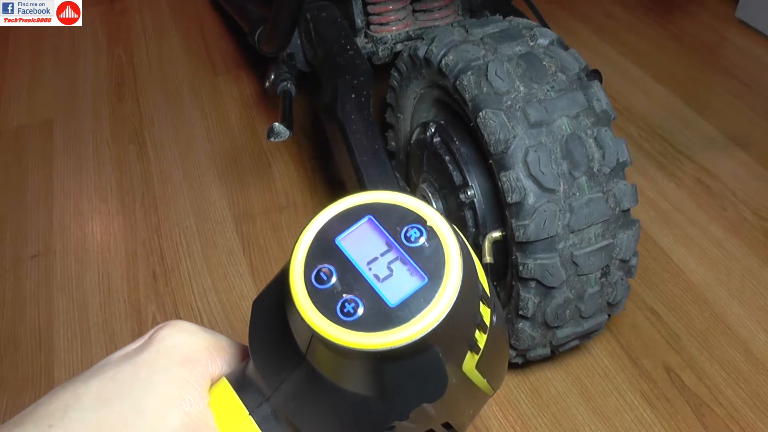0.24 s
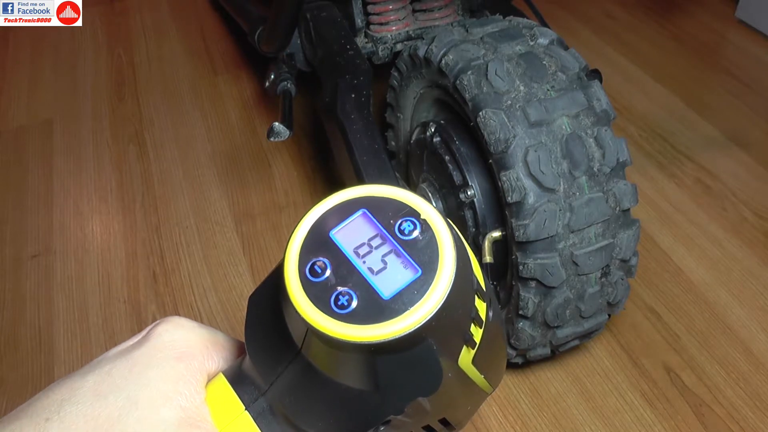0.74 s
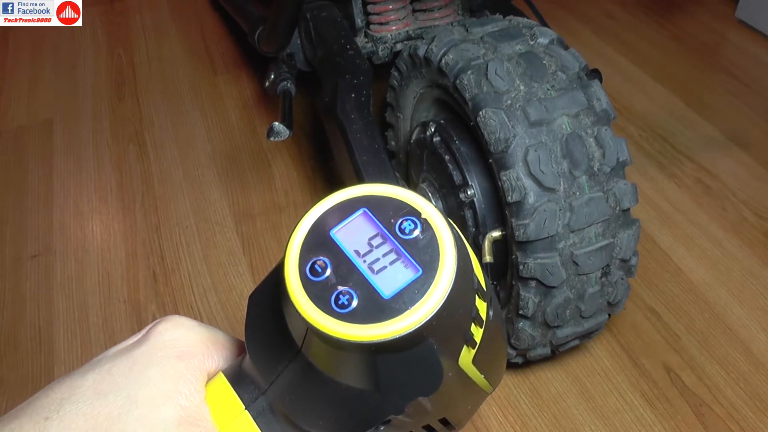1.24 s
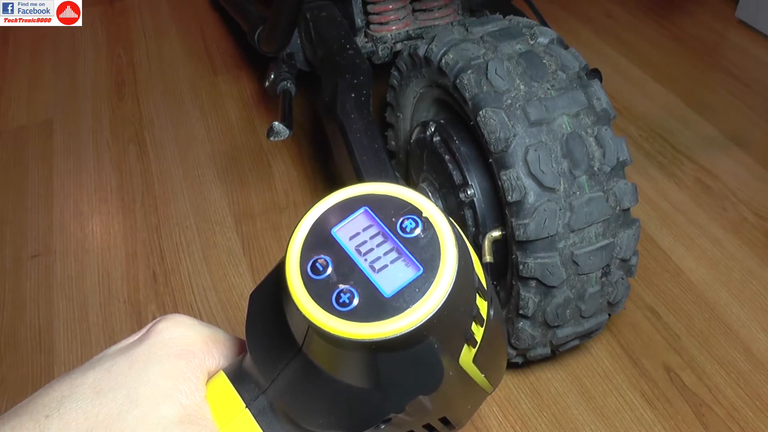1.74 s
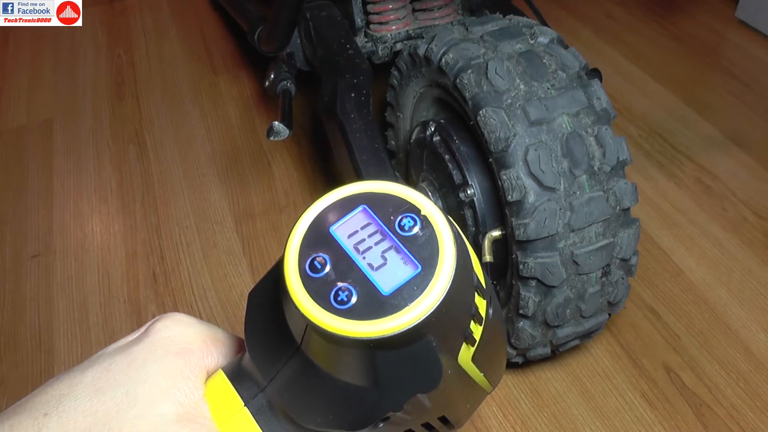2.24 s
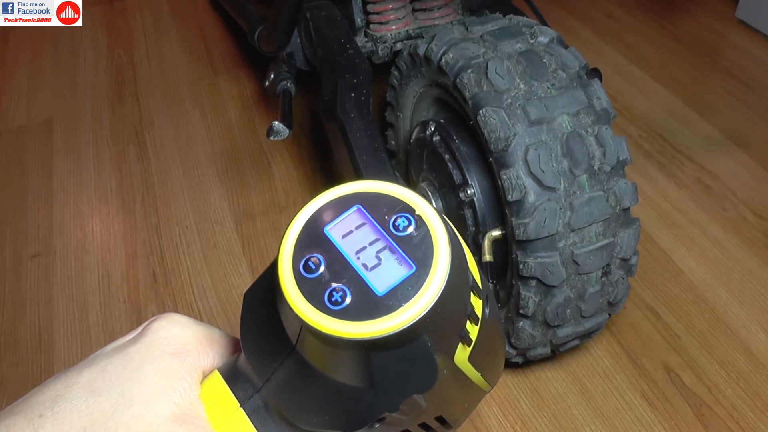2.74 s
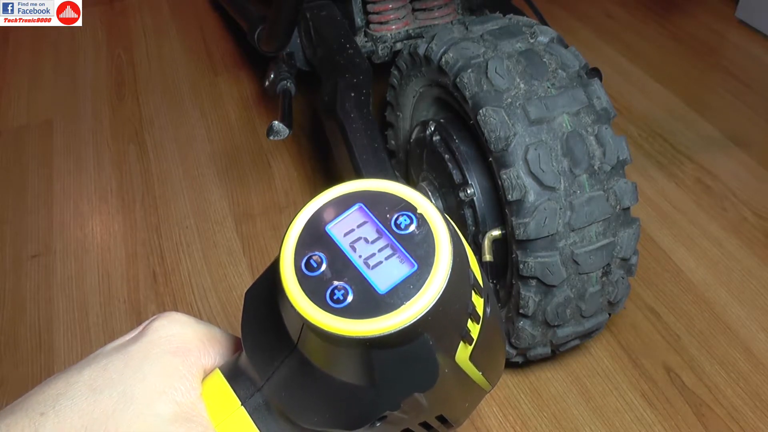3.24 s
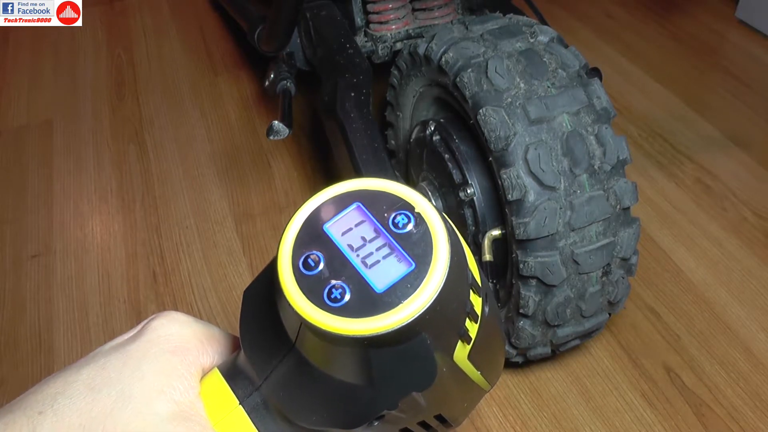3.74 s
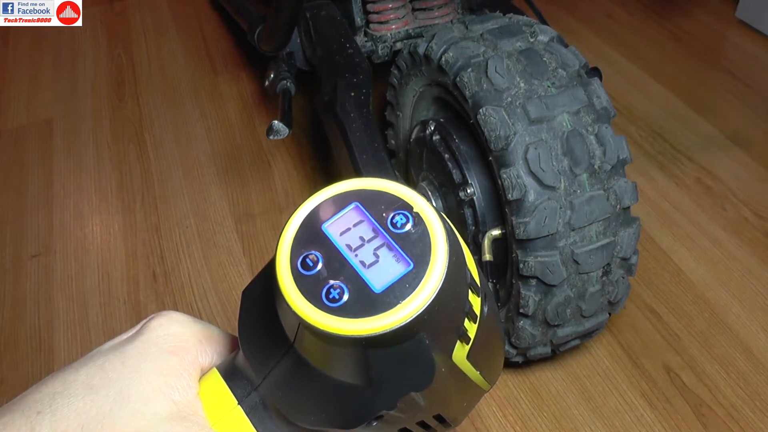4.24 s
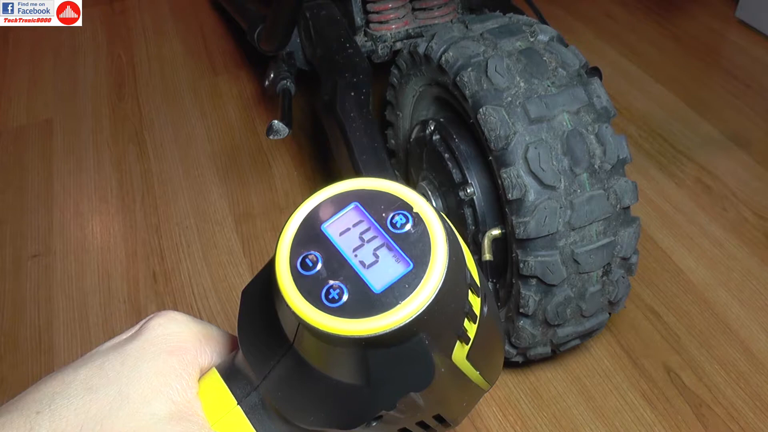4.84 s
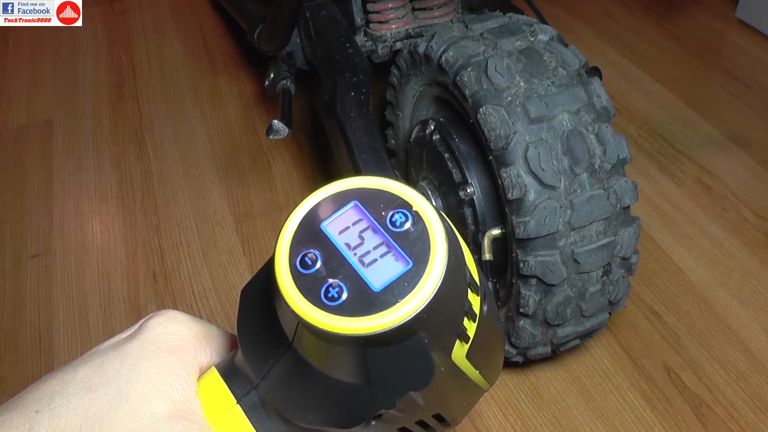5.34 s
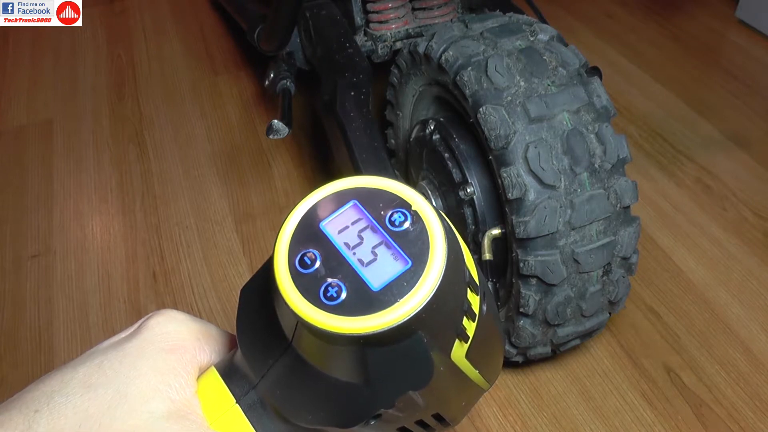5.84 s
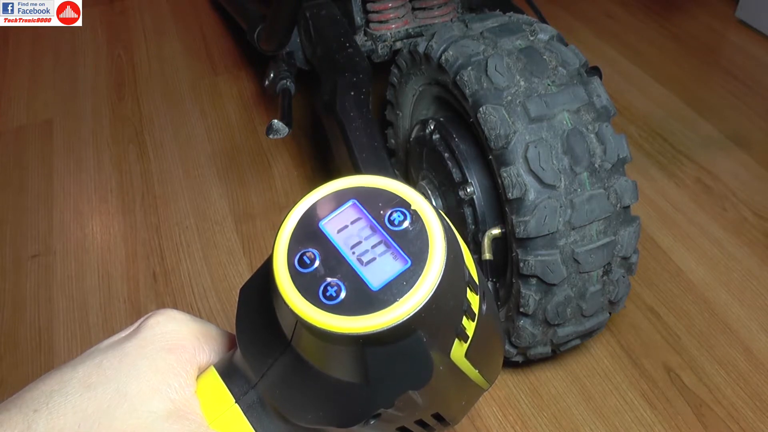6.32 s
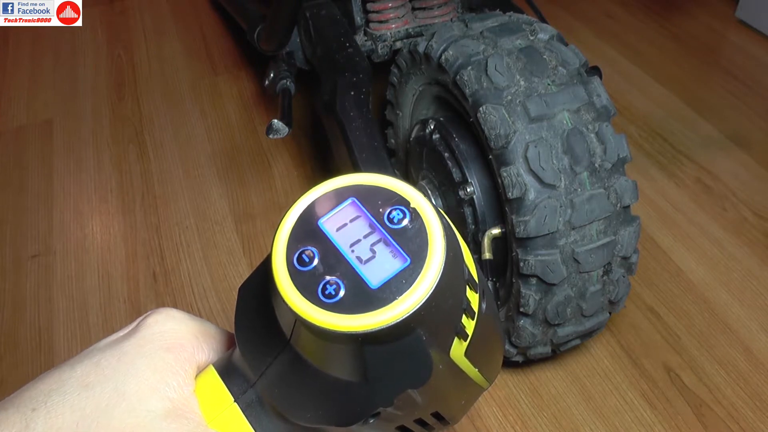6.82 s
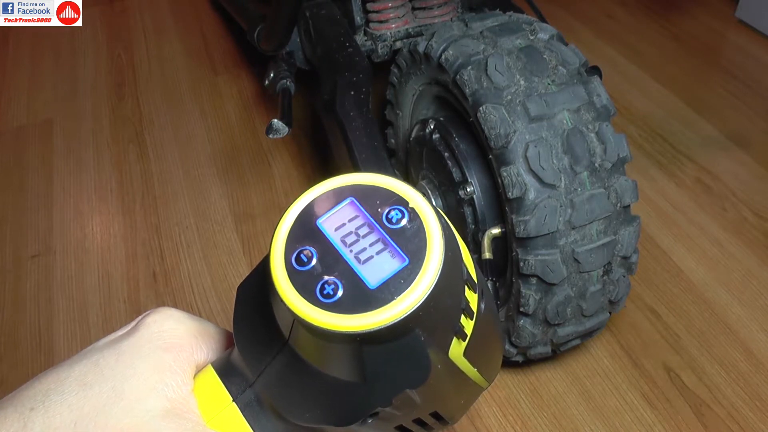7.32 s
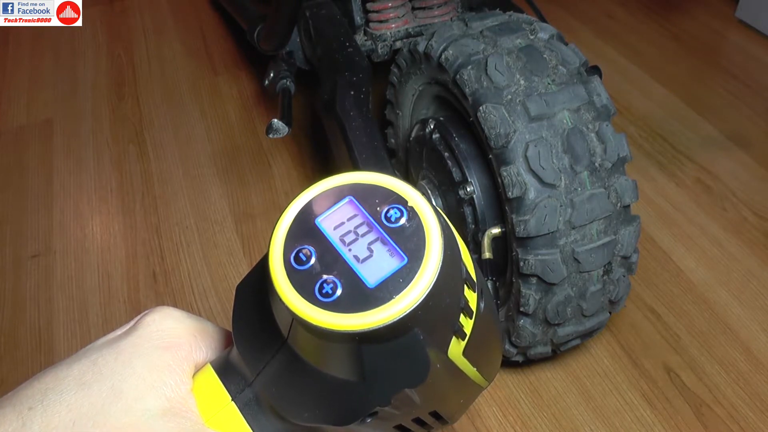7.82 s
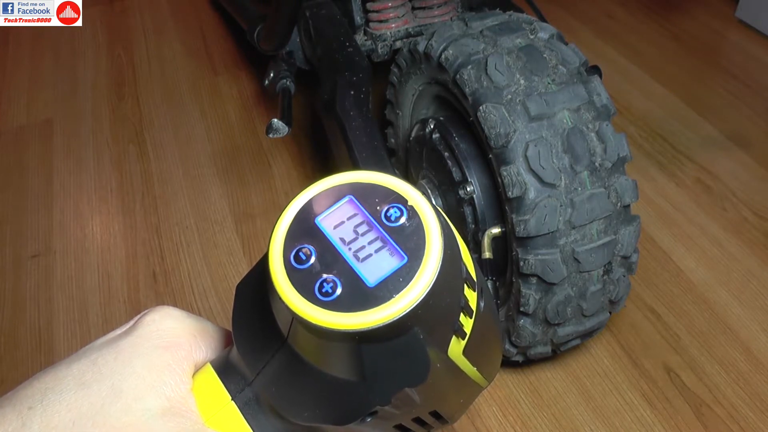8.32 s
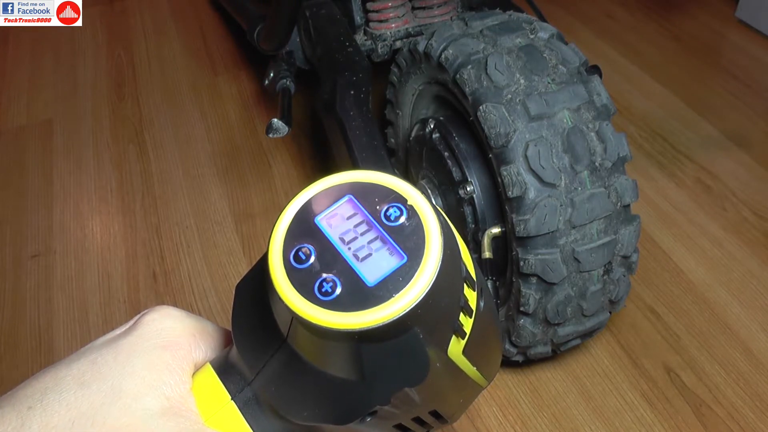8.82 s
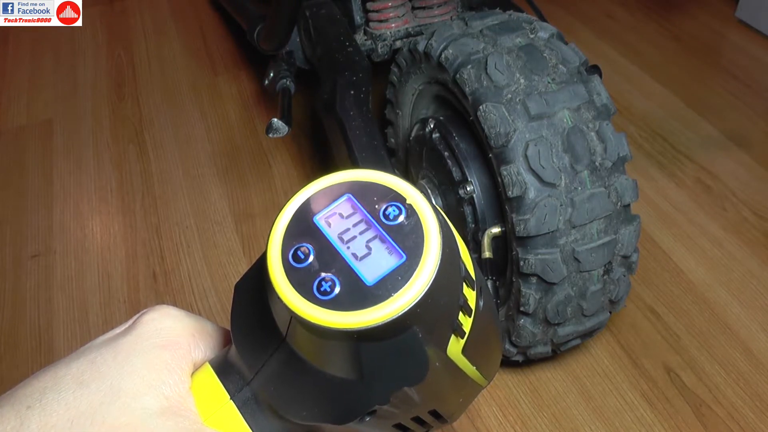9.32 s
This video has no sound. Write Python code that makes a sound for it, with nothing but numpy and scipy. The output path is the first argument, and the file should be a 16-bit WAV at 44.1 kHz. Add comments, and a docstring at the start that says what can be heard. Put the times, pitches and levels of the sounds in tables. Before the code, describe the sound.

A small battery tyre inflator runs nonstop, a harsh buzzing motor drone with gear whine and rattle, hardening slightly as pressure rises.

```python
"""In a room with a wooden floor, a hand-held battery inflator pumps up a tyre.
A small motor drives the crank through an 11:49 gear pair, whose teeth whine and rattle under the load
of about fifty compression strokes a second. On each stroke the outlet valve pops, rings the cylinder and
hose, and spits air. The rotor hums, the brushes ring the motor can, air rushes and the room reflects it all;
rising pressure slows the crank and hardens the pop."""
import sys
import numpy as np
from scipy import signal
from scipy.fft import rfft, irfft, next_fast_len
from scipy.io import wavfile
from scipy.ndimage import uniform_filter1d

SR = 44100
rng = np.random.default_rng(int(sys.argv[2]) if len(sys.argv) > 2 else 0)


def dump_mix(stems):
    """Bounce the given channels to the path in sys.argv[1] as a 16-bit WAV at rate SR."""
    frames = np.atleast_2d(stems).T  # one column per channel
    limited = np.clip(frames, -1, 1)  # hard clip at full scale
    pcm = np.round(limited * 32767).astype(np.int16)
    wavfile.write(sys.argv[1], SR, pcm)


N = 422037
TIME = np.arange(N) / SR
SIDES = np.array([[1], [-1]])  # sign of a left-right difference: left, right

# The crank slows as the tyre fills. Each row: time in seconds, speed in turns per second.
CRANK_SPEED = [(0.0, 52.233), (2.78, 51.364), (4.23, 51.016), (5.77, 50.489), (6.95, 50.29), (8.29, 49.952),
               (9.57, 49.778)]
PINION_TEETH, WHEEL_TEETH = 11, 49
START_TURN = .2  # crank angle at the start, in turns
# Back pressure on the pump, which only rises. Each row: time in seconds, pressure from 0 (soft) to 1 (hard).
BACK_PRESSURE = [(0, .11), (2.8, .15), (4.6, .48), (9.57, 1)]
# Relative force on the teeth round the crank. Each row: angle in turns, dB at a soft tyre, dB at a hard tyre.
TOOTH_FORCE = [(0, 3.5, 1), (.08, -1, 4), (.17, -21, -3.5), (.3, -6, -2), (.58, -15, -30), (.7, -14, -10),
               (.79, 0.5, -4.5), (.9, 2.5, 5)]
# Harmonics 1-6 of the tooth rate. Each row: relative level in dB at a soft tyre, the same at a hard tyre,
# lag behind the load in turns at a soft tyre, the same at a hard tyre, growth in dB per dB of load,
# left-right difference in dB, lead of the left side in radians.
WHINE_HARMONICS = [(-17, -6, -0.031, 0.077, 2, 5.5, 0.6), (1.5, 0.4, -0.034, -0.027, 1.4, 2, 0.2),
                   (1.9, -2, 0.055, -0.061, 1.66, -2, 0.16), (-7, -12.5, -0.061, -.012, 1.4, 4, 0.63),
                   (-12, -12, -0.022, -0.024, 1.5, -4, 0.64), (-31, -27, -.012, -.012, 1.02, -1.5, .75)]
# Spectrum of the gear rattle. Each row: frequency in Hz, relative density in dB per Hz.
RATTLE_SPECTRUM = [(60, -45), (500, -20), (1150, -10), (1650, -7.5), (2300, 5.5), (2900, -12.5), (4600, -4),
                   (5800, -4), (6600, -1.5), (8300, -0.5), (10200, 2), (11700, -3.5), (13000, 2.5),
                   (15800, -28)]
# Housing resonances that shape the rattle. Each row: centre in Hz, width in Hz, rise (or fall) in dB.
HOUSING_PEAKS = [(5030, 350, -11), (7440, 190, 13), (8860, 450, 11), (12600, 550, -7)]
# Gain of the gear sound: dB at a soft tyre, dB at a hard tyre.
GEAR_GAIN_DB = (-22, -20.5)
# The gear sound moves slowly from right to left: left-right dB at the start, and dB per second.
GEAR_PAN_DB, GEAR_PAN_DB_PER_S = -1.2, 0.25
# Crank angle at which the valve opens: turns at a soft tyre, turns at a hard tyre.
OPENING_TURN = (.11, .145)
# Strength of the valve's pop. Each row: time in seconds, level in dB.
POP_LEVEL = [(0, -26.5), (2.7, -27.5), (4.5, -25.1), (9.57, -24.5)]
# Cylinder and hose resonances rung by the valve.
# Each row: centre in Hz, width in Hz, relative level in dB at a soft tyre, the same at a hard tyre.
CHAMBER_MODES = [(88, 41, -39.5, -41.5), (192, 37, -38.5, -42.5), (292.5, 74, -38.5, -45.5),
                 (404.8, 15.8, -31.5, -43), (567.5, 132, -39, -29.5), (741, 91, -27.5, -30),
                 (1038, 52, -33.5, -39)]
# Hum of the three-pole rotor. Each row: multiple of the motor speed, level in dB at zero back pressure.
ROTOR_HUM = [(1, -59.5), (2, -47), (3, -36.5), (4, -52.5), (5, -48), (6, -49), (9, -45.5)]
# Spectrum of air rushing through the valve. Each row: frequency in Hz, relative density in dB per Hz.
AIR_SPECTRUM = [(30, -42), (100, -31), (220, -23), (380, -13.5), (480, -3.5), (750, -0.5), (940, -3.5),
                (1120, -4.5), (1650, -7.5), (2100, -6), (3000, -10.5), (6500, -5.5), (10000, -9.5),
                (15000, -31)]
# Relative air flow round the crank. Each row: angle in turns, strength in dB.
AIR_FLOW = [(.05, -2.5), (.17, -7.5), (.29, -2), (.4, -8.5), (.6, -7), (.85, -4.5)]
# Spectrum of the spit as the valve cracks open. Each row: frequency in Hz, relative density in dB per Hz.
SPIT_SPECTRUM = [(60, -42), (400, -14), (950, -16), (1150, 6), (1700, -0.5), (2200, -2), (2800, -8),
                 (3400, 2.5), (6500, -1), (10000, -2), (15000, -13)]
# Resonances of the motor can, rubbed by the brushes. Each row: centre in Hz, half the width in Hz of each
# of two resonators in series, level in dB at a soft tyre, the same at a hard tyre.
CAN_MODES = [(1102, 32, -46, -53), (2223, 150, -64, -36.5), (4141, 44, -45, -37), (6690, 97, -43.5, -39.5)]
# Likeness of noise at the two microphones. Each row: frequency in Hz, likeness (held within 0-1 after reading).
MIC_LIKENESS = [(100, -0.2), (700, 2), (1500, 0.7), (4000, 1.3), (6500, 1), (9000, .45), (13000, 0.13)]
# Balance of noise over the two microphones. Each row: frequency in Hz, left-right difference in dB.
MIC_PAN = [(100, -11), (700, -1.5), (1300, 0), (2400, 2), (3200, -0.5), (6000, -1.5), (8100, 12.5),
           (8800, -1.5), (10300, -0.5), (11300, -5), (12800, -2.5), (15000, -13)]
ROOM_T60_S, ROOM_DB = 0.22, -14
CUTOFF_HZ = 15800


def from_db(db):
    """A level in decibels is twenty times the logarithm of the amplitude ratio."""
    return 10 ** (np.asarray(db) / 20)


def in_time(rows):
    """Slow changes are linear between known times; gives one curve for each column."""
    known_s, *columns = np.transpose(rows)
    return [np.interp(TIME, known_s, column) for column in columns]


def round_crank(rows, turn):
    """A machine repeats with every turn, so each column is read periodically in angle."""
    angle, *columns = np.transpose(rows)
    return [np.interp(turn, angle, column, period=1) for column in columns]


def at_hz(points, hz):
    """A spectrum is read linearly on a logarithmic frequency axis."""
    known_hz, value = np.transpose(points)
    return np.interp(np.log(hz), np.log(known_hz), value)


def between(soft, hard, pressure):
    """A quantity moves linearly with the tyre pressure."""
    return soft + (hard - soft) * pressure


def evened(x):
    """Dividing by the running rms over half a second holds the mean power at 1."""
    power = np.mean(np.atleast_2d(x) ** 2, axis=0)
    return x / np.sqrt(uniform_filter1d(power, size=SR // 2) + 1e-20)


def drift(rate):
    """Low-passed noise of spread 1 wanders smoothly, about rate times a second."""
    hz = np.fft.rfftfreq(N, 1 / SR)
    slow = irfft(rfft(rng.standard_normal(N)) / (1 + (hz / rate) ** 2), N)
    return slow / slow.std()


def resonate(x, hz, width_hz):
    """A damped mode is a pole pair whose radius sets the bandwidth; its peak gain is 1."""
    radius = np.exp(-np.pi * abs(width_hz) / SR)
    zeros = np.array([1, 0, -1]) * (1 - radius * radius) / 2
    poles = [1, -2 * radius * np.cos(2 * np.pi * hz / SR), radius * radius]
    return signal.lfilter(zeros, poles, x)


def radiate(pair, spectrum, peaks=()):
    """Mixing two unrelated, coloured noises sets the coherence of the two microphones; overall rms 1."""
    size = next_fast_len(N + SR // 10)
    hz = np.fft.rfftfreq(size, 1 / SR) + 1
    peaks_db = sum(db / (1 + (2 * (hz - centre) / width) ** 2) for centre, width, db in peaks)
    mid, side = rfft(pair, size) * from_db(at_hz(spectrum, hz) + peaks_db)
    alike = np.clip(at_hz(MIC_LIKENESS, hz), 0, 1)
    both = np.sqrt(1 + alike) * mid + SIDES * np.sqrt(1 - alike) * side
    both = both * from_db(SIDES * at_hz(MIC_PAN, hz) / 2)
    out = irfft(both, size)[:, :N]
    return out / out.std()


def tooth_load(turn, pressure):
    """Tooth force, in dB, peaks in compression and lasts longer against a hard tyre."""
    return between(*round_crank(TOOTH_FORCE, turn), pressure)


def gear_whine(turn, mesh, pressure, flutter=0.096, slip_rad=0.033):
    """Meshing teeth excite harmonics of the tooth rate, which swell with load; no two teeth meet quite alike."""
    whine = 0
    for k, row in enumerate(WHINE_HARMONICS, 1):
        soft_db, hard_db, soft_lag, hard_lag, grip, pan_db, lead_rad = row
        lag_turn = between(soft_lag, hard_lag, pressure)
        force_db = grip * tooth_load(turn - lag_turn, pressure)
        force = from_db(force_db) / np.sqrt(np.mean(from_db(2 * force_db)))  # rms 1
        level = from_db(between(soft_db, hard_db, pressure) + SIDES * pan_db / 2)
        gain = level * force * (1 + flutter * drift(280))
        phase = 2 * np.pi * k * (mesh + k / 4) + slip_rad * drift(150) + SIDES * lead_rad / 2
        whine = whine + gain * np.cos(phase)
    return evened(whine)


def gear_rattle(motor, mesh, force, repeating=0.93, tooth_depth=0.62):
    """Pinion flaws give noise that recurs every motor turn; the rest is chance, and the teeth chop both."""
    flaws = irfft(np.exp(2j * np.pi * rng.random(size=(2, 72))), n=4096)
    worn = np.array([np.interp(motor % 1, np.linspace(0, 1, len(flaw)), flaw / flaw.std()) for flaw in flaws])
    share = np.clip(repeating, 0, 1)  # of the power
    grit = np.sqrt(share) * worn + np.sqrt(1 - share) * rng.standard_normal((2, N))
    chopping = 1 + tooth_depth * np.cos(2 * np.pi * mesh)
    return radiate(grit * force * chopping, RATTLE_SPECTRUM, HOUSING_PEAKS)


def clicks_at(turn, opening, jitter_s, uneven_db):
    """An impulse marks each passage of the crank through the opening angle, slightly uneven in time and size."""
    passed = turn - opening
    strokes = np.arange(np.ceil(passed[0]), passed[-1])
    chance = rng.standard_normal((len(strokes), 2))
    at = np.interp(strokes, passed, np.arange(N)) + jitter_s * SR * chance[:, 0]
    at = np.clip(at, 0, N - 2)
    size = from_db(uneven_db * chance[:, 1])
    # each impulse is shared between the two nearest samples
    whole, part = at.astype(int), at % 1
    return np.bincount(whole, size * (1 - part), N) + np.bincount(whole + 1, size * part, N)


def valve(turn, angle, pressure, bounce=0.29, bounce_turn=0.1378, seated=0.79, low_hz=85, soft_hz=690):
    """Impulses ring the chamber modes once a stroke; at low pressure the valve bounces and pops again."""
    pops = clicks_at(turn, angle, jitter_s=.00002, uneven_db=0.22)
    bounces = clicks_at(turn, angle + bounce_turn, jitter_s=.00004, uneven_db=1.5)
    pops = pops + bounce * np.clip(1 - pressure / seated, 0, 1) * bounces
    rung = 0
    for hz, width_hz, soft_db, hard_db in CHAMBER_MODES:
        rung = rung + from_db(between(soft_db, hard_db, pressure)) * resonate(pops, hz, width_hz)
    # the puff lasts about a millisecond, and so small a body radiates little bass
    softened = signal.sosfilt(signal.butter(2, soft_hz, "low", fs=SR, output="sos"), rung)
    return evened(signal.sosfilt(signal.butter(3, low_hz, "high", fs=SR, output="sos"), softened))


def rotor(motor, waver_db=2.0):
    """Unbalance and pole pull are periodic forces, heard as multiples of the motor speed."""
    hum = sum(from_db(db) * np.sin(2 * np.pi * (round(k) * motor + rng.random())) for k, db in ROTOR_HUM)
    return np.sqrt(2) * hum * from_db(waver_db * drift(4.7))


def rushing_air(turn):
    """Turbulent flow makes broadband noise, modulated here by the flow round the crank."""
    flow = from_db(round_crank(AIR_FLOW, turn)[0])
    return radiate(flow * rng.standard_normal((2, N)), AIR_SPECTRUM)


def spit(turn, angle, delay_turn=.02, fade_turn=0.063, uneven_db=2.5):
    """A short turbulent jet follows each valve opening and decays exponentially with crank angle."""
    since_turn = (turn - angle - delay_turn) % 1
    jet = np.exp(-since_turn / fade_turn) * from_db(uneven_db * drift(27))
    return radiate(jet * rng.standard_normal((2, N)), SPIT_SPECTRUM)


def brushes(pressure):
    """Friction is a steady random force: the brushes rub all the way round and keep the motor can ringing."""
    rub = rng.standard_normal(N)
    ringing = 0
    for hz, half_width_hz, soft_db, hard_db in CAN_MODES:
        ring = resonate(resonate(rub, hz, 2 * half_width_hz), hz, 2 * half_width_hz)
        ringing = ringing + from_db(between(soft_db, hard_db, pressure)) * ring / ring.std()
    return ringing


def room(x):
    """Diffuse reflections decay exponentially, as noise that differs at each microphone."""
    t = TIME[:SR // 2]
    tail = rng.standard_normal((2, len(t))) * from_db(-60 * t / ROOM_T60_S)
    tail /= np.sqrt(np.sum(tail ** 2, axis=1, keepdims=True))
    tail = signal.sosfilt(signal.butter(2, 450, "high", fs=SR, output="sos"), tail)
    # the pump has been running for a while, so its sound is put ahead of the start
    running = np.hstack([x[:, :len(t) - 1], x])
    return signal.fftconvolve(running, tail, "valid", axes=1)


def scene(whine_db=-1.42, rattle_db=-7, rattle_grip=1.0, stroke_db=0.83,
          sag_soft=0.011, sag_hard=0.023, fastest_soft=0.69, fastest_hard=0.71,
          valve_pan_db=-1.4, rotor_fade_db=-3, air_db=-30, air_rise_db=4.5,
          spit_soft_db=-41, spit_hard_db=-32):
    """The crank angle times the cyclic sounds of the pump; the tyre pressure alters their strengths."""
    (speed,), (pressure,), (pop_db,) = in_time(CRANK_SPEED), in_time(BACK_PRESSURE), in_time(POP_LEVEL)
    turn = START_TURN + np.cumsum(speed) / SR + 0.00077 * drift(3.6)
    # the crank slows during each compression, so every burst of whine falls in pitch
    fastest_turn = between(fastest_soft, fastest_hard, pressure)
    sag = between(sag_soft, sag_hard, pressure) * np.sin(2 * np.pi * (turn - fastest_turn)) / (2 * np.pi)
    mesh = WHEEL_TEETH * (turn + sag)  # teeth passed
    motor = mesh / PINION_TEETH  # motor turns

    whine = from_db(whine_db) * gear_whine(turn, mesh, pressure)
    force = from_db(rattle_grip * tooth_load(turn, pressure))
    rattle = from_db(rattle_db) * gear_rattle(motor, mesh, force)
    gear_pan_db = GEAR_PAN_DB + GEAR_PAN_DB_PER_S * TIME
    gear_db = between(*GEAR_GAIN_DB, pressure) + stroke_db * drift(38) + SIDES * gear_pan_db / 2
    gears = (whine + rattle) * from_db(gear_db)

    # a harder tyre holds the valve shut for longer
    angle = between(*OPENING_TURN, pressure)
    pop = from_db(pop_db) * valve(turn, angle, pressure)
    hum = from_db(rotor_fade_db * pressure) * rotor(motor)
    body = (pop + hum) * from_db(SIDES * valve_pan_db / 2)
    rush = from_db(air_db + air_rise_db * pressure) * rushing_air(turn)
    jets = from_db(between(spit_soft_db, spit_hard_db, pressure)) * spit(turn, angle)
    pump = gears + body + rush + jets + brushes(pressure)
    return pump + from_db(ROOM_DB) * room(pump)


def record(dry):
    """An elliptic low-pass filter cuts the top steeply."""
    return signal.sosfilt(signal.ellip(12, .1, 90, CUTOFF_HZ, fs=SR, output="sos"), dry)


dry = scene()
out = record(dry)
dump_mix(out)
```